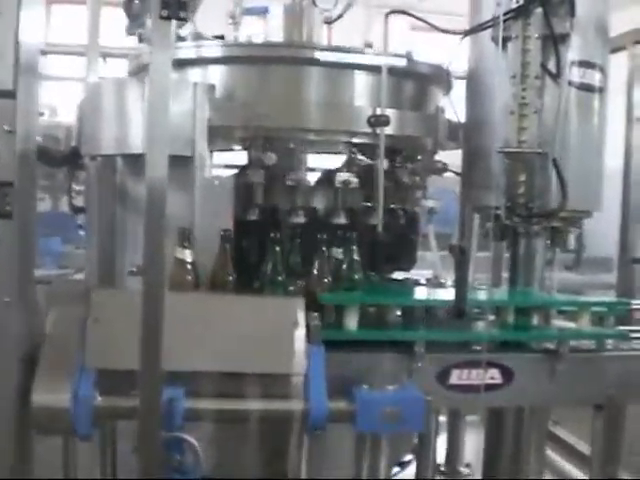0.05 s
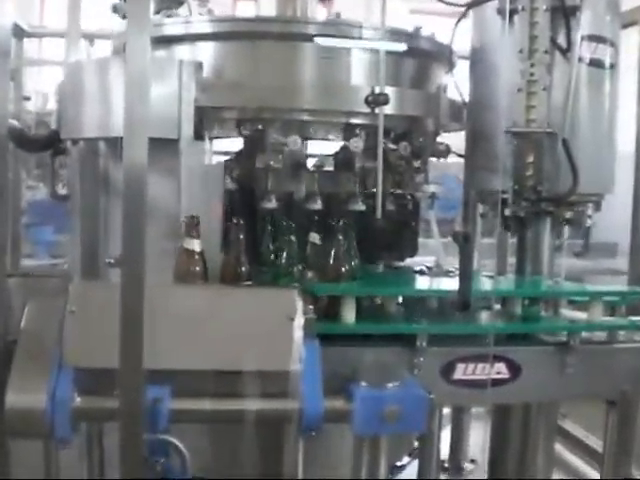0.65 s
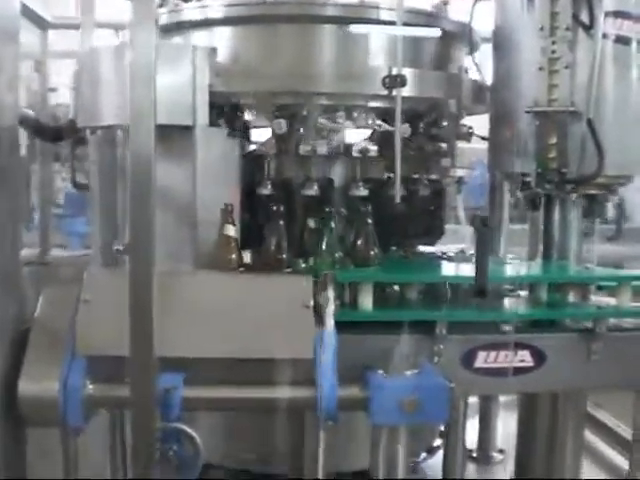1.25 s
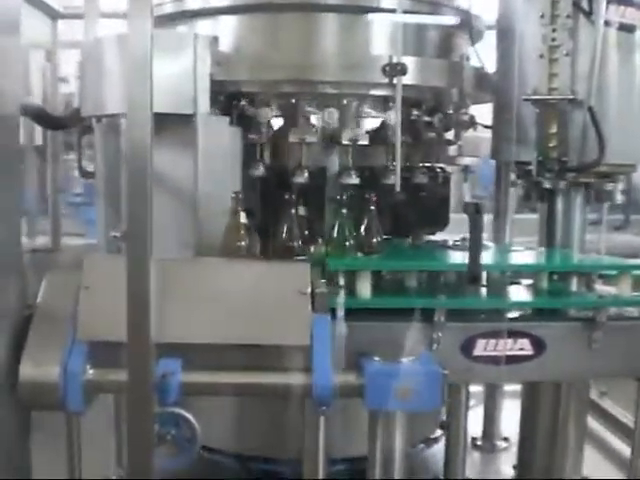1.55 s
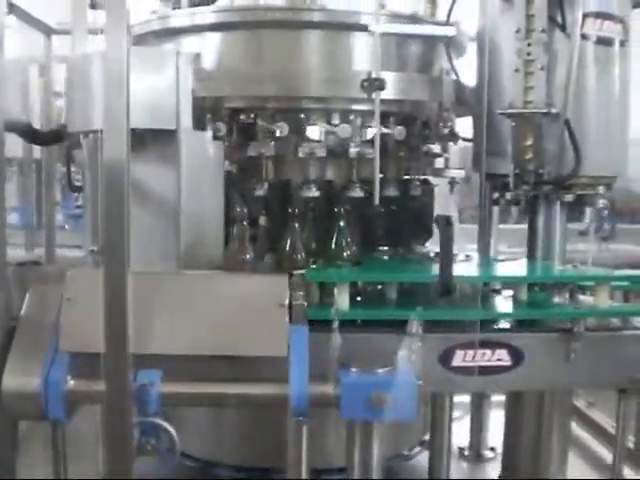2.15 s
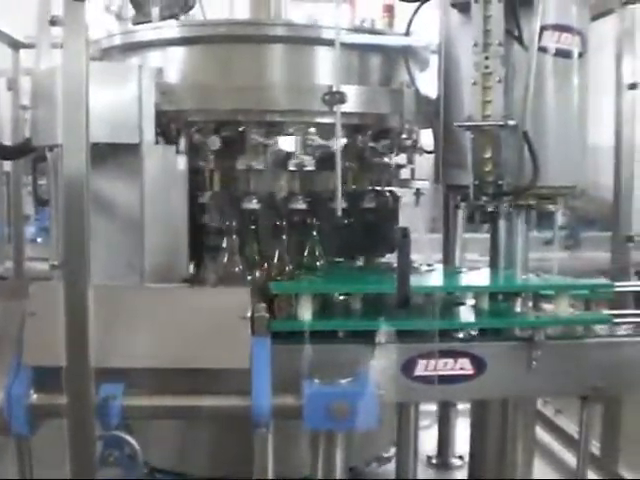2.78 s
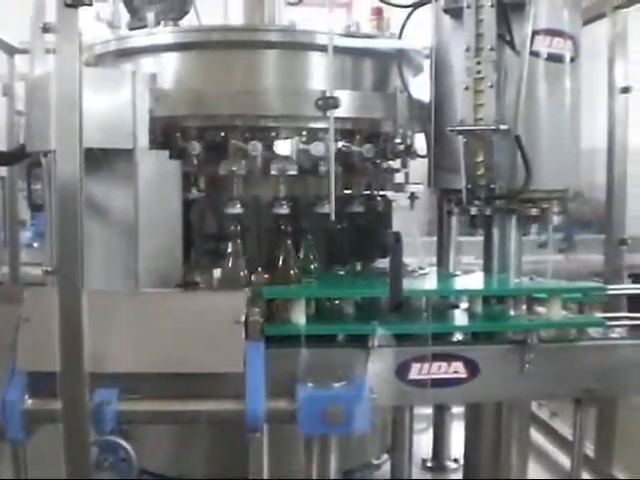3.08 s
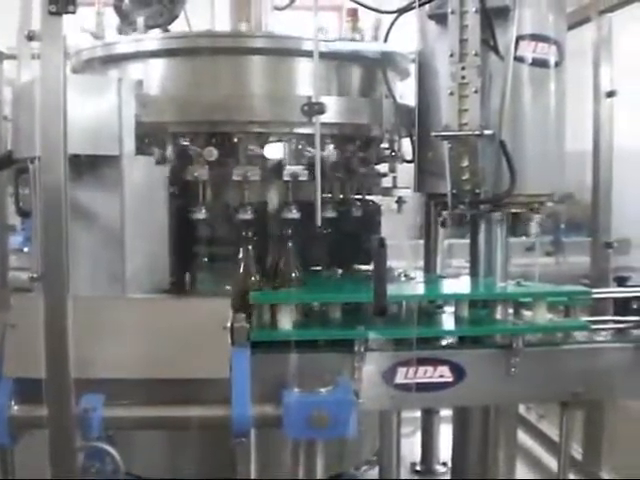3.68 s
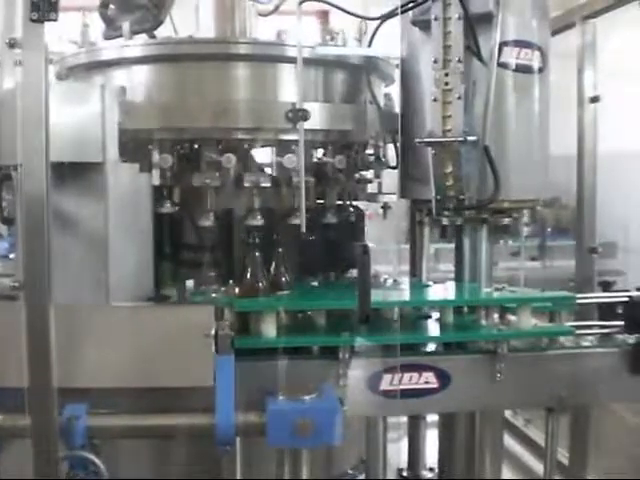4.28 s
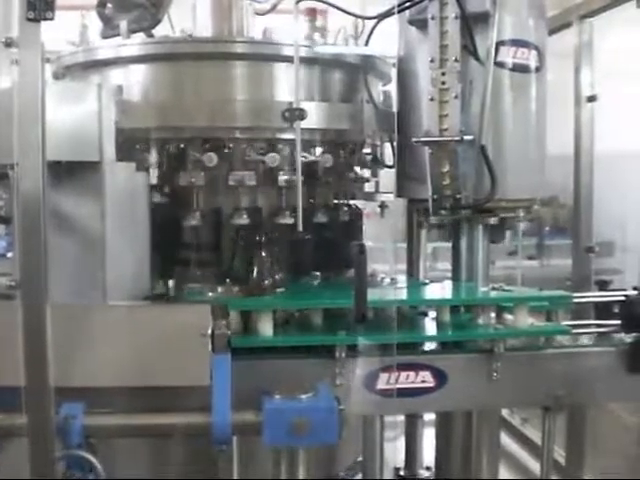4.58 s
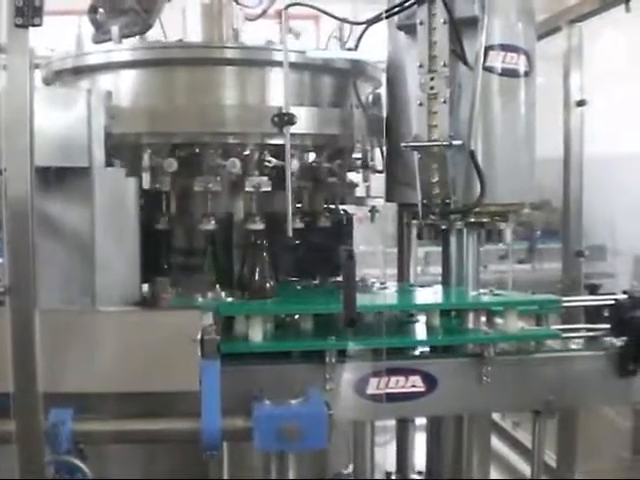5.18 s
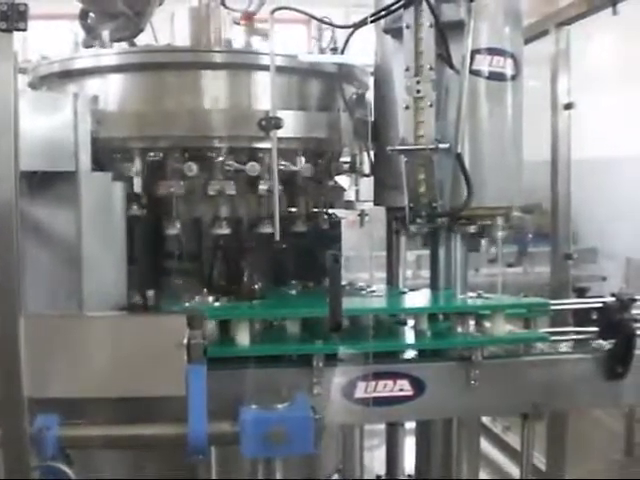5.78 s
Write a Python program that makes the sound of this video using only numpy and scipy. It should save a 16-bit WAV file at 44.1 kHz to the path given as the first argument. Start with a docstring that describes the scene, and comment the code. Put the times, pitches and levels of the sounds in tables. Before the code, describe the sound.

Compressed air hisses loudly and steadily from a rotary bottle filler close to the microphone, swelling gently as its valves vent in turn. The low rumble of a bottling hall lies underneath, with two faint, brief hums from the drive. Near the end the hiss narrows to a thinner, higher spray, sputters twice and opens again, followed by a quick cluster of dull metallic knocks.

```python
"""A wide, steady hiss of compressed air, blown off close by from a rotary bottle filler.
Vents swell as the valves come round; late on the jet is pinched to a thin spray, sputters twice and
reopens. The air is turbulent noise, coloured by the cavities of valves and bottle necks.
Under it lie the rumble of the bottling hall, two brief hums of the drive and a few dull knocks."""
import sys
import numpy as np
from scipy import signal
from scipy.fft import rfft, irfft
from scipy.io import wavfile
from scipy.ndimage import uniform_filter1d

SR = 44100
rng = np.random.default_rng(int(sys.argv[2]) if len(sys.argv) > 2 else 0)


def materialize(psi):
    """Save the field psi as 16-bit PCM at rate SR to the path in sys.argv[1].

    A 1-D psi becomes a single channel; in a 2-D psi each row is a channel.
    """
    bounded = np.clip(np.atleast_2d(psi).T, -1, 1)
    quanta = np.round(bounded * 32767).astype(np.int16)
    wavfile.write(sys.argv[1], SR, quanta)


N = 266364
TIME, HZ = np.arange(N) / SR, np.fft.rfftfreq(N, 1 / SR)


def gain_of(db):
    """Decibels to amplitude."""
    return 10 ** (np.asarray(db) / 20)


def unit_rms(x):
    """Scales to rms 1."""
    return x / np.sqrt(np.mean(x ** 2) + 1e-20)


def bump(peak_s, half_s):
    """A bell-shaped envelope: 1 at the peak, 1/e a half length to either side."""
    return np.exp(-((TIME - peak_s) / half_s) ** 2)


def colour_db(points, hz):
    """A spectrum joined by straight lines on a log-frequency axis."""
    point_hz, db = np.transpose(points)
    return np.interp(np.log(hz + 1), np.log(point_hz + 1), db)


def resonance_db(modes, hz):
    """The dB that a set of resonances adds at each frequency."""
    return sum(db / (1 + (2 * (hz - centre) / width) ** 2) for centre, width, db in modes)


def shaped_noise(spectrum_db):
    """Noise of rms 1 with the given spectrum."""
    return unit_rms(irfft(rfft(rng.standard_normal(N)) * gain_of(spectrum_db), N))


def jitter(samples):
    """A quick random tremble of rms 1, smoothed over so many samples."""
    return unit_rms(uniform_filter1d(rng.standard_normal(N), size=samples))


def wander(step_s):
    """A slow random curve of rms 1 that turns at every step."""
    knots = np.arange(0, N / SR + 1, step_s)
    return unit_rms(np.interp(TIME, knots, rng.standard_normal(400)[:len(knots)]))


def drift(shape, bins, frames):
    """A random field of rms 1, smoothed across frequency bins and time frames."""
    field = uniform_filter1d(rng.standard_normal(shape), bins, axis=0)
    return unit_rms(uniform_filter1d(field, frames, axis=1))


def hall_rumble(level_db=-33.5, stir_db=0.35):
    """Conveyors and distant machines blend into a slowly stirring bed with a few swells."""
    # The tone of the hall. Each row: frequency in Hz, relative level in dB.
    hall_colour = [(20, -5.5), (50, -5.5), (100, -6), (200, -2), (330, -0.7), (500, -1.7), (610, 3.5),
                   (700, -0.3), (1000, 0), (1350, -1), (2200, -0.5), (5000, -1.5), (11000, -15)]
    # The conveyors swell. Each row: peak time in seconds, half length in seconds, lift in dB.
    swells = [(.44, .13, 3.5), (2.93, .05, 3), (5.3, .2, 1.4)]
    swell_db = sum(db * bump(peak_s, half_s) for peak_s, half_s, db in swells)
    envelope = gain_of(level_db + stir_db * wander(step_s=0.2) + swell_db)
    return envelope * shaped_noise(colour_db(hall_colour, HZ))


def drive_hums(waver_share=0.014):
    """The drive hums up briefly, slightly unsteady in pitch."""
    # Each row: peak time in seconds, half length in seconds, pitch in Hz, level in dB.
    hums = [(0.75, 0.14, 390, -47), (2.403, 0.19, 140, -46.5)]
    out = np.zeros(N)
    for peak_s, half_s, hz, db in hums:
        wavering_hz = hz * (1 + waver_share * jitter(samples=2000))
        tone = np.sqrt(2) * np.sin(2 * np.pi * np.cumsum(wavering_hz) / SR)
        out += gain_of(db) * tone * bump(peak_s, half_s)
    return out


def machine_knocks(rise_s=0.0034):
    """Each knock rings one part, shakes the frame around that pitch and dies away in the hall."""
    # Each row: start in seconds, level in dB, pitch in Hz, spread in octaves,
    # seconds to fall 60 dB, share of clean ring from 0 to 1.
    knocks = [(5.842, -24.5, 1380, .6, 0.16, 0.46), (5.862, -31.5, 368, 0.95, 0.47, 0),
              (5.938, -35.5, 600, 0.28, 0.42, .5), (5.962, -28, 506, 0.52, 0.28, 0.4),
              (5.97, -40.5, 178, .3, .5, 0.7), (5.985, -35.5, 337, 0.89, 0.37, 0.5)]
    # Resonances of the steel frame and guards. Each row: centre in Hz, width in Hz, lift in dB.
    frame_modes = [(336, 38, 7), (505, 45, 1), (620, 70, 4), (900, 90, -3), (1050, 90, 15), (1370, 120, 13)]
    out = np.zeros(N)
    for start_s, db, hz, spread, t60, ring_share in knocks:
        age = np.maximum(TIME - start_s, 0)
        octaves_off = np.log2((HZ + 1) / hz)
        blow_db = -10 * np.log10(1 + (octaves_off / spread) ** 4)
        shake = np.sqrt(1 - ring_share) * shaped_noise(blow_db + resonance_db(frame_modes, HZ))
        ring = np.sqrt(2 * ring_share) * np.sin(2 * np.pi * hz * age)
        envelope = (1 - np.exp(-age / rise_s)) * np.exp(-np.log(1000) * age / t60)
        out += gain_of(db) * (shake + ring) * envelope
    return out


def air_stream(colour, pinch, level_db, band_hz, ripple_db, flutter_db, surge_db, pitch=1, patch_db=0.5):
    """Turbulent air rings the cavities; pitch scales its colour and pinch brings in the edge tones."""
    # Cavities of valves and bottle necks. Each row: centre in Hz, width in Hz, lift in dB.
    cavities = [(1490, 42, 5.5), (1650, 50, 7.5), (2715, 32, 4.5), (3137, 72, -1), (3240, 36, -1),
                (3540, 100, 1), (4240, 40, 3), (4540, 38, 2.5), (7574, 40, 0)]
    # Edge tones of the outlet. Each row: centre in Hz, width in Hz, lift in dB at full pinch.
    edge_tones = [(3870, 180, 4.5), (4460, 410, -8), (4940, 90, 3), (5700, 240, 4.5), (5940, 120, 7.5),
                  (7850, 1700, -3), (9430, 700, 6.5), (10480, 180, 5)]
    hz, frame_s, spectra = signal.stft(rng.standard_normal(N), SR, nperseg=2048, noverlap=1536)
    pitch = np.interp(frame_s, TIME, pitch * np.ones(N))
    edge_db = np.outer(resonance_db(edge_tones, hz), np.interp(frame_s, TIME, pinch))
    cavity_db = resonance_db(cavities, hz)[:, None]
    shape = gain_of(colour_db(colour, hz[:, None] / pitch) + cavity_db + edge_db)
    # Reflections off the turning carousel shift the colour: broad patches, fine standing-wave ripple.
    patches = drift(spectra.shape, bins=60, frames=3)
    ripple = drift(spectra.shape, bins=2, frames=45)
    shape *= gain_of(patch_db * patches + ripple_db * ripple)
    # level_db sets the level inside band_hz, however the colour moves.
    in_band = (hz > band_hz[0]) & (hz < band_hz[1])
    shape /= np.sqrt((shape[in_band] ** 2).sum(0) / len(hz))
    air = signal.istft(spectra * shape, nperseg=2048, noverlap=1536)[1][:N]
    return air * gain_of(level_db + flutter_db * jitter(samples=500) + surge_db * wander(step_s=0.11))


def blow_off():
    """Jet, vents and fine spray share one air supply, divided by passing valves and the outlet's pinch."""
    # The colours of the three streams. Each row: frequency in Hz, relative level in dB.
    jet_colour = [(900, -34.5), (1400, -24), (1850, -23), (2020, -12.5), (2180, -14), (2400, -9),
                  (3000, -10.5), (3550, -9.5), (3850, -6), (4150, -1.9), (4700, 1.6), (5050, -0.5),
                  (5350, -2), (5580, -2.5), (5850, -6), (6400, -9.5), (10800, -18)]
    vent_colour = [(1200, -25.5), (2000, -12.5), (2350, -4.5), (2700, -1), (2950, -1), (3200, 2.5),
                   (3550, -4.5), (4100, -17), (5500, -26)]
    spray_colour = [(4200, -18.5), (5500, -1.5), (6100, -2.5), (6450, -4), (6800, -2.5), (7500, 0),
                    (7950, 1), (8300, -1.2), (8650, 2), (8950, -1), (9400, 1.4), (9850, 1.5), (10400, 0),
                    (10900, -1.5)]
    # Steady air as the supply builds. Each row: time in seconds, jet level in dB, vent leak in dB.
    supply = [(0, -19, -32), (0.7, -18.5, -31), (1.4, -19.1, -27.5), (2.0, -18, -28), (4.5, -18, -28.5),
              (6.04, -18, -29.5)]
    # A valve vents about every 1.25 s, with one short extra spurt. Each row: peak time in seconds,
    # half length in seconds, level in dB, shift of the jet's pitch factor.
    valves = [(0.26, 0.28, -26, 0.031), (1.431, .3, -28, 0.04), (2.69, 0.31, -24.5, .06),
              (3.98, .2, -23.5, .035), (5.165, .06, -24, .02), (5.652, .045, -26, -0.055)]
    # The outlet narrows, half reopens, narrows again and eases open.
    # Each row: time in seconds, pinch from 0 to 1.
    pinch_curve = [(2, 0), (5.195, 0.28), (5.225, 0.85), (5.47, 0.95), (5.57, 0.74), (5.69, 0.54),
                   (5.725, 0.8), (5.76, 0.95), (5.785, 0.25), (6.04, .3)]
    # The air catches. Each row: time in seconds, half length in seconds, depth of the dip in dB.
    sputters = [(5.712, .01, 4.5), (5.765, .01, 6)]
    pinch = np.interp(TIME, *np.transpose(pinch_curve))
    choke = pinch ** 2.5  # only a tight pinch diverts much air
    openings = [bump(peak_s, half_s) for peak_s, half_s, _, _ in valves]
    valve_open = sum(openings)
    _, _, open_db, pitch_shifts = np.transpose(valves)
    supply_s, supply_db, leak_db = np.transpose(supply)
    leak_power = gain_of(np.interp(TIME, supply_s, leak_db)) ** 2
    valve_power = np.dot(gain_of(open_db) ** 2, openings)
    # An open valve robs the jet and adds a little spray; the choke turns jet and vent air into spray.
    jet_db = np.interp(TIME, supply_s, supply_db) - 1.36 * valve_open - 6.3 * choke
    vent_db = 10 * np.log10(leak_power + valve_power) - 4 * choke
    spray_db = -24 + 0.3 * valve_open + 5.5 * choke
    jet_pitch = 0.96 + np.dot(pitch_shifts, openings) + 0.036 * choke  # a narrower gap hisses higher
    jet = air_stream(jet_colour, pinch, jet_db, band_hz=(3800, 5300),
                     ripple_db=2.0, flutter_db=0.16, surge_db=0.38, pitch=jet_pitch)
    vents = air_stream(vent_colour, pinch, vent_db, band_hz=(2300, 3500),
                       ripple_db=3.5, flutter_db=0, surge_db=0.25)
    spray = air_stream(spray_colour, pinch, spray_db, band_hz=(8000, 10800),
                       ripple_db=1.8, flutter_db=0.53, surge_db=0.27)
    dip_db = sum(db * bump(at_s, half_s) for at_s, half_s, db in sputters)
    return (jet + vents + spray) * gain_of(-dip_db)


def scene():
    """Air in front, machinery behind, in mono."""
    return (blow_off() + hall_rumble() + drive_hums() + machine_knocks())[None]


def record(dry):
    """The microphone cuts one narrow notch in the treble, and a low-pass takes off the very top."""
    notch_hz, notch_width_hz, cutoff_hz = 7228, 250, 10890
    offset_hz = HZ - notch_hz
    notched = irfft(rfft(dry) * abs(offset_hz) / np.hypot(offset_hz, notch_width_hz), N)
    lowpass = signal.firwin(1501, cutoff_hz, window=("kaiser", 9), fs=SR)
    return signal.oaconvolve(notched, lowpass[None], "same")


dry = scene()
out = record(dry)
materialize(out)
```